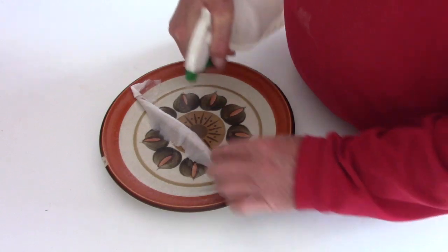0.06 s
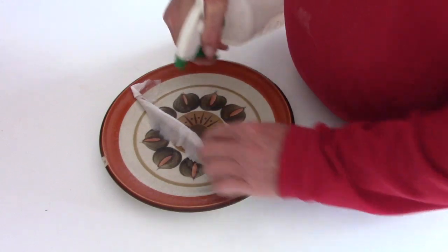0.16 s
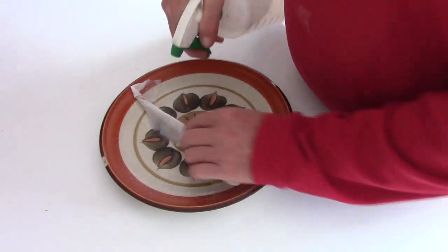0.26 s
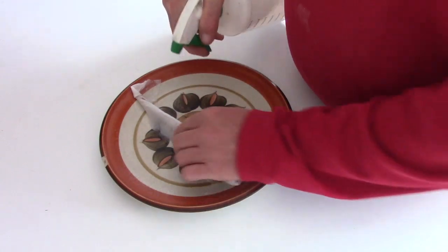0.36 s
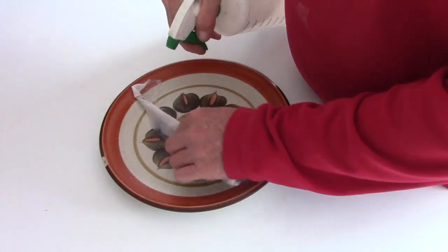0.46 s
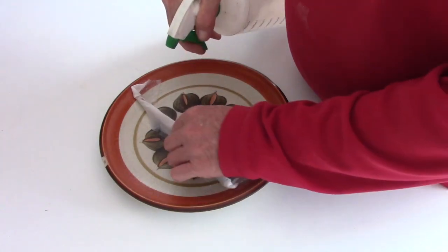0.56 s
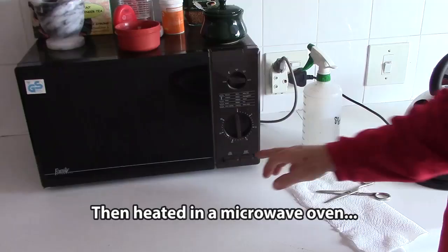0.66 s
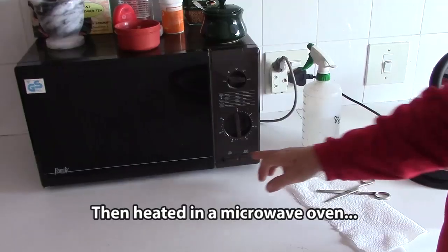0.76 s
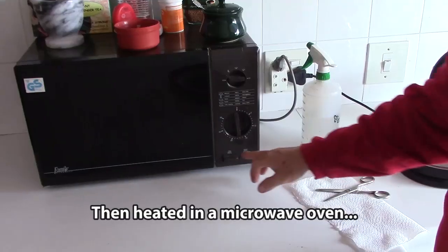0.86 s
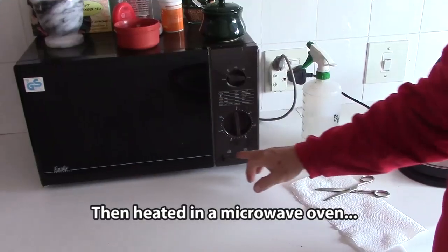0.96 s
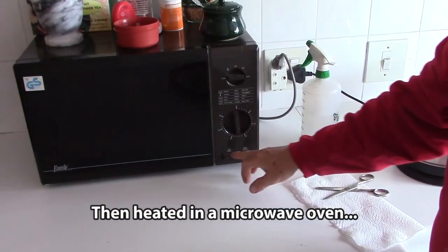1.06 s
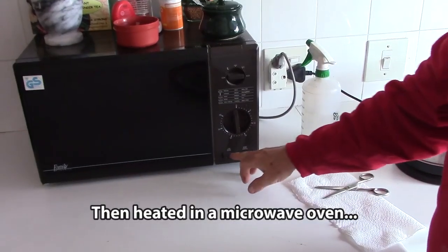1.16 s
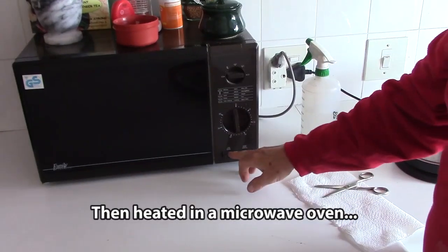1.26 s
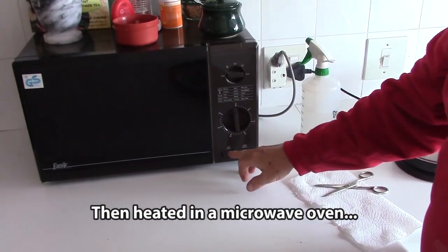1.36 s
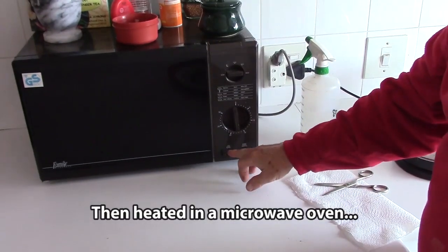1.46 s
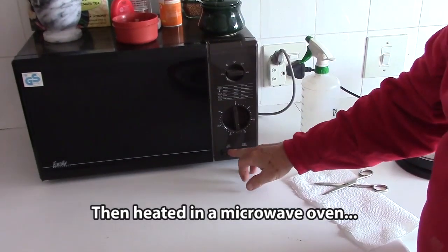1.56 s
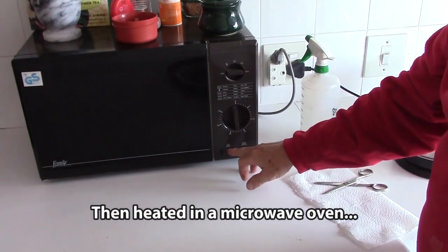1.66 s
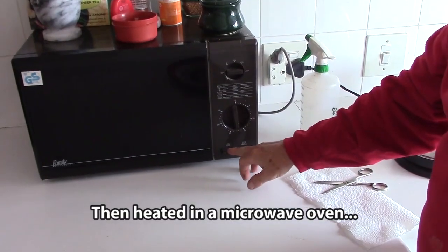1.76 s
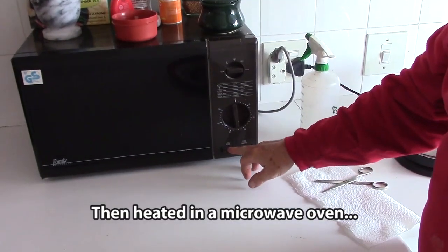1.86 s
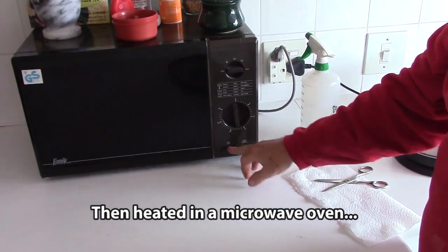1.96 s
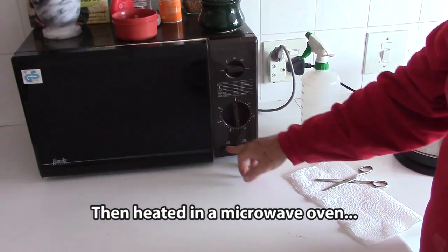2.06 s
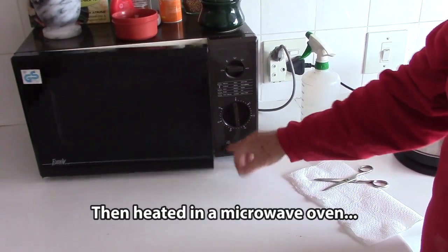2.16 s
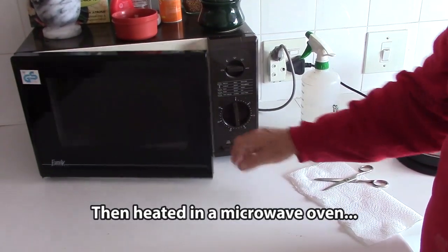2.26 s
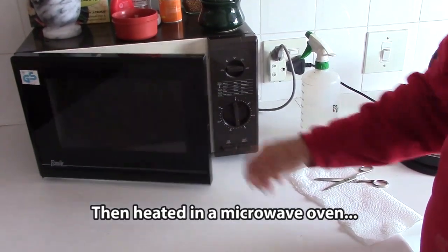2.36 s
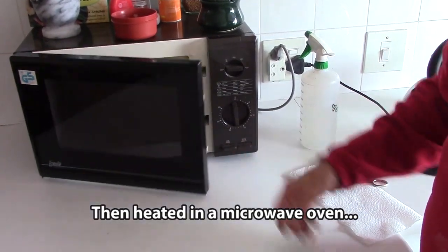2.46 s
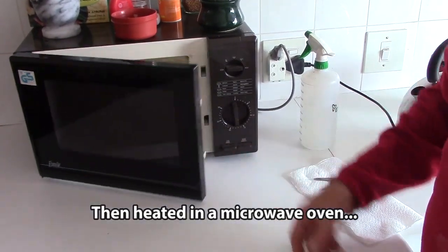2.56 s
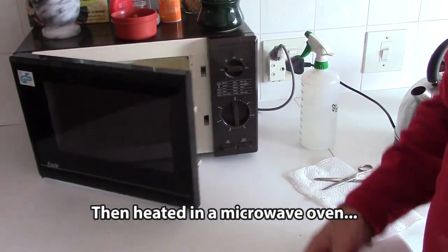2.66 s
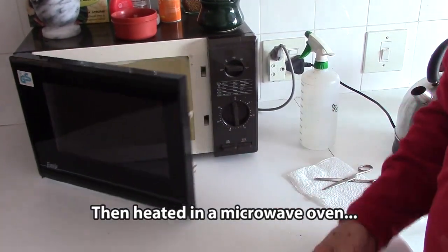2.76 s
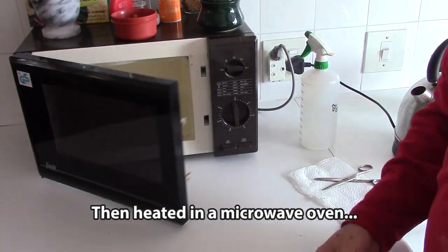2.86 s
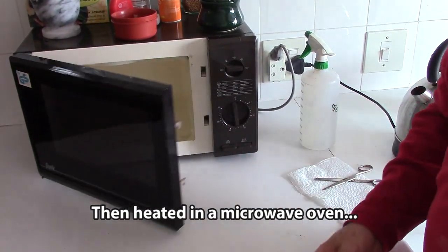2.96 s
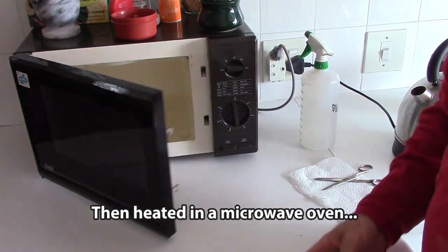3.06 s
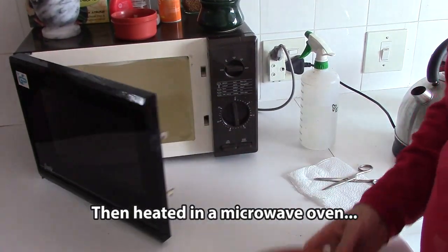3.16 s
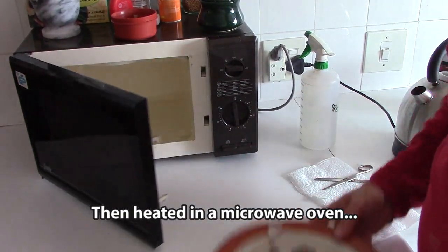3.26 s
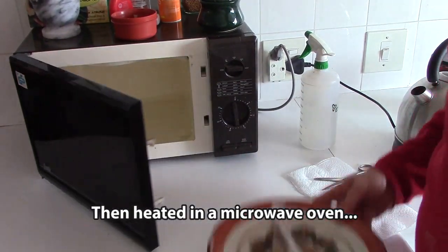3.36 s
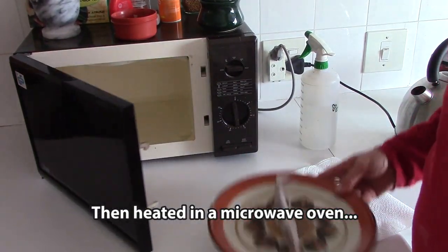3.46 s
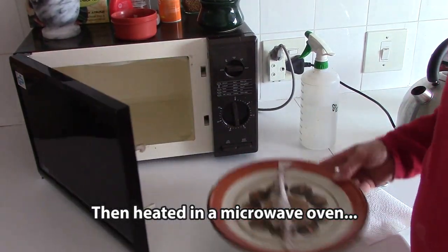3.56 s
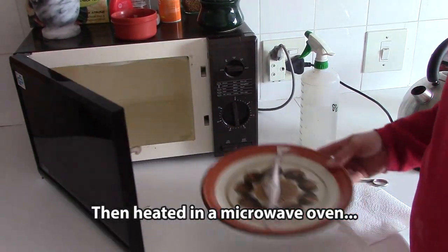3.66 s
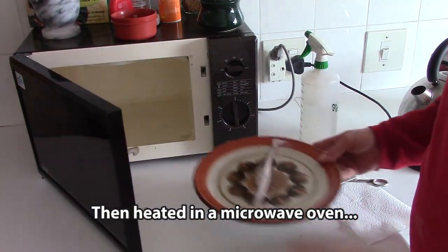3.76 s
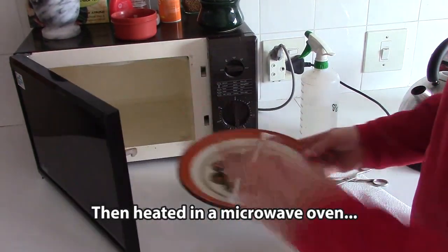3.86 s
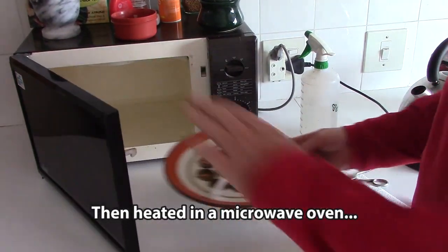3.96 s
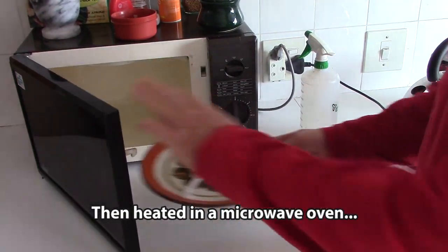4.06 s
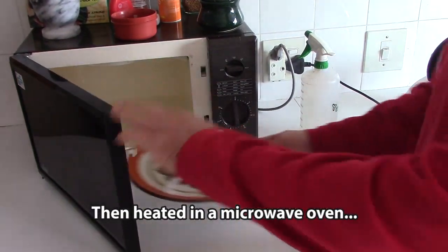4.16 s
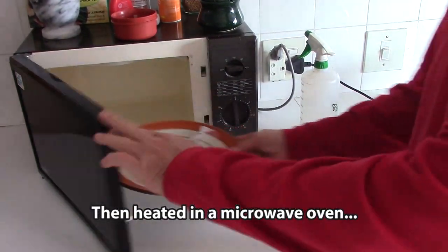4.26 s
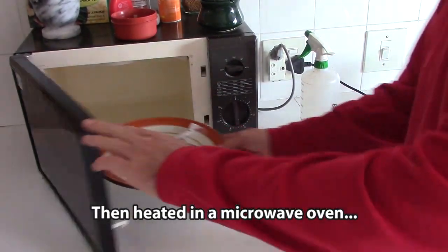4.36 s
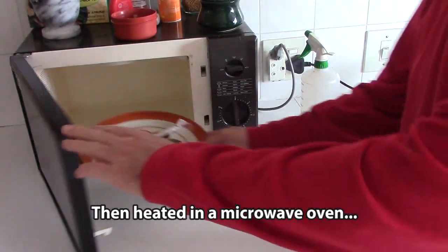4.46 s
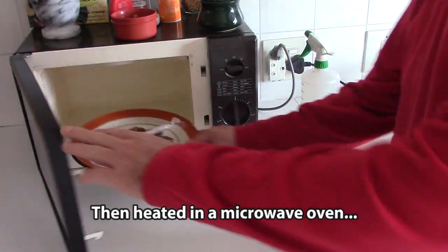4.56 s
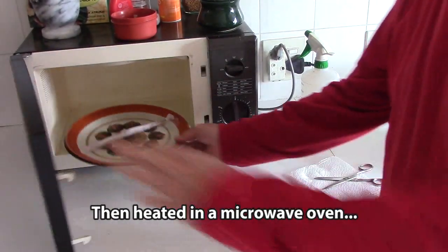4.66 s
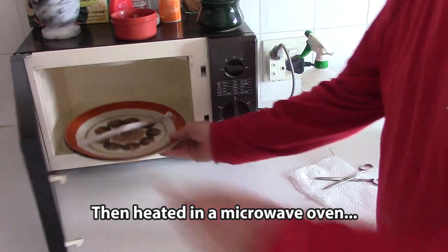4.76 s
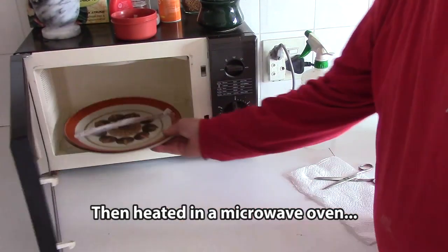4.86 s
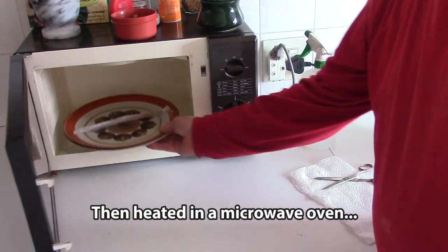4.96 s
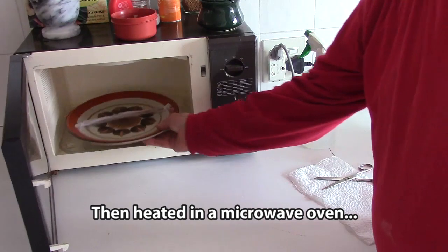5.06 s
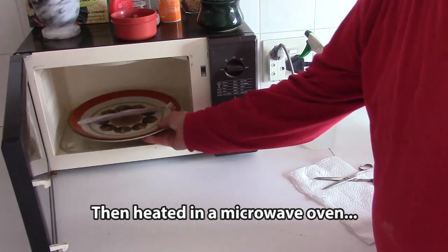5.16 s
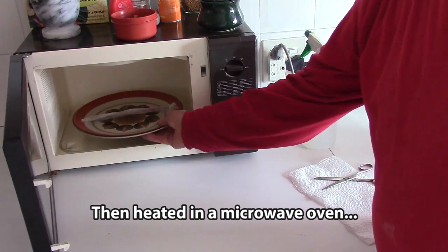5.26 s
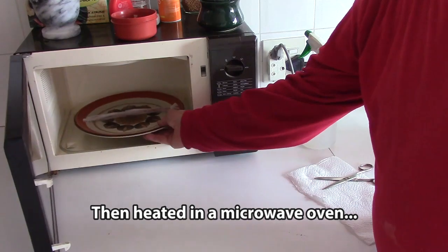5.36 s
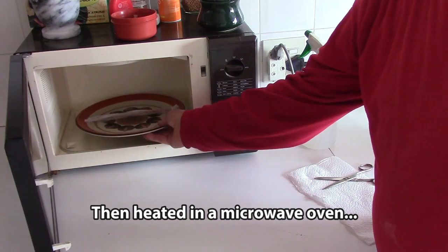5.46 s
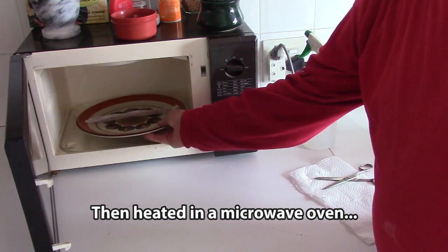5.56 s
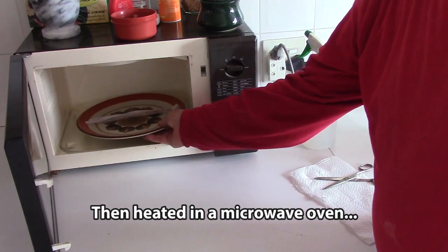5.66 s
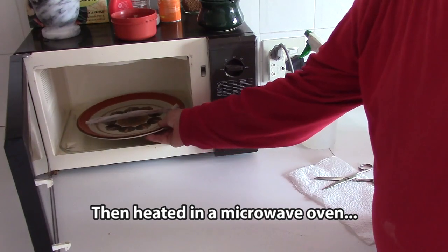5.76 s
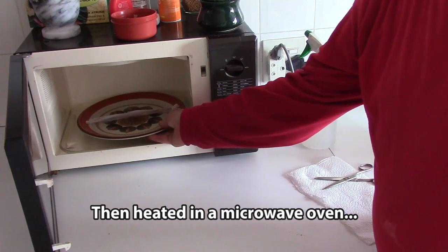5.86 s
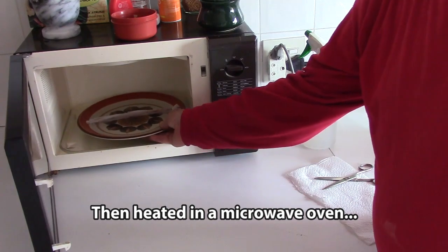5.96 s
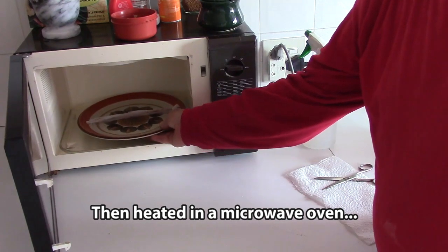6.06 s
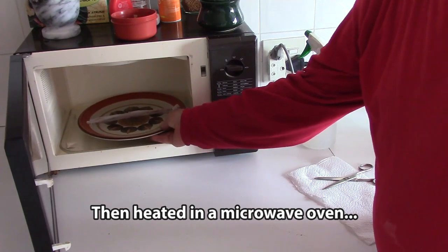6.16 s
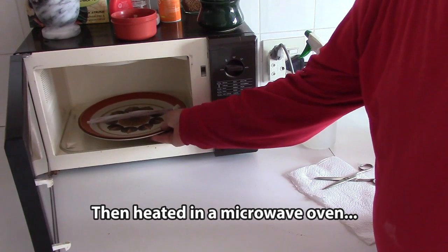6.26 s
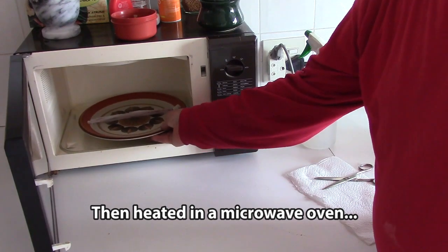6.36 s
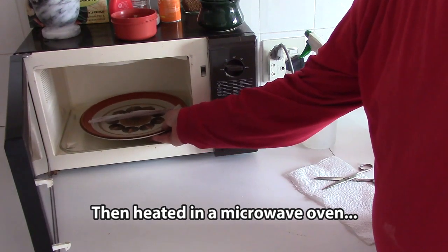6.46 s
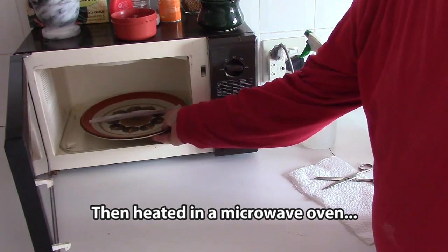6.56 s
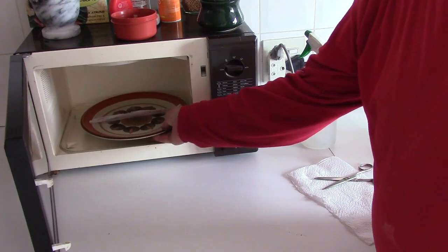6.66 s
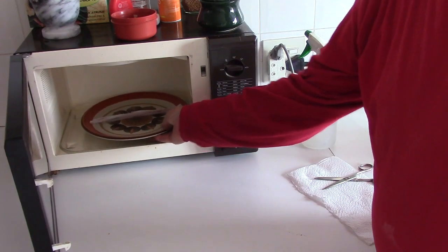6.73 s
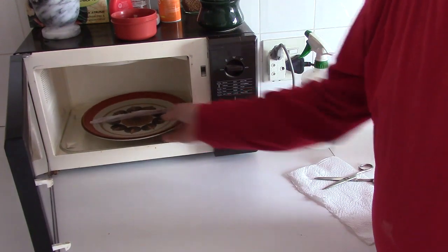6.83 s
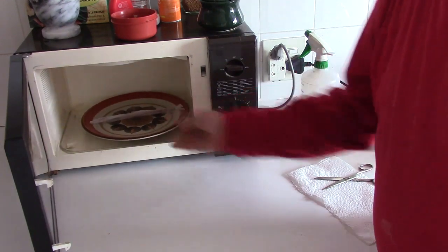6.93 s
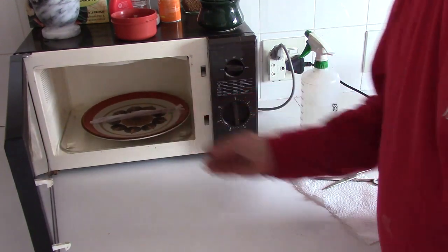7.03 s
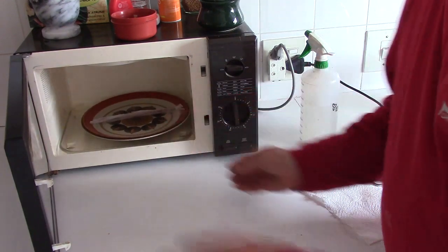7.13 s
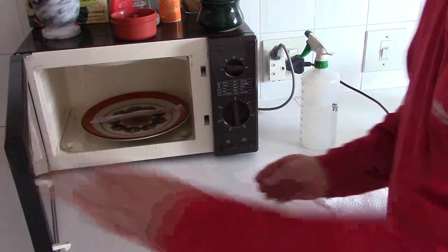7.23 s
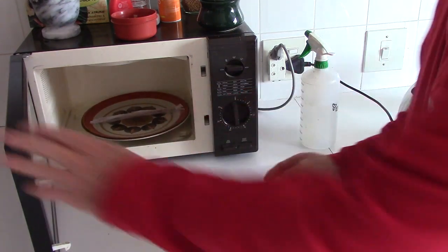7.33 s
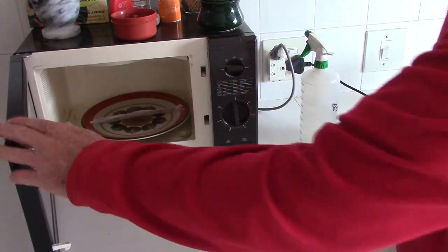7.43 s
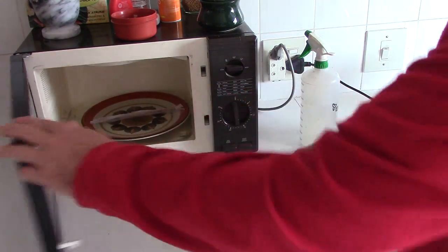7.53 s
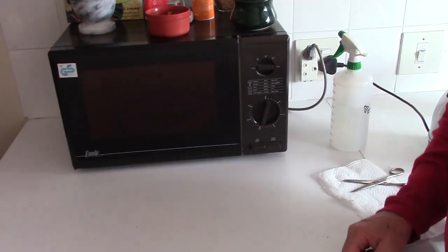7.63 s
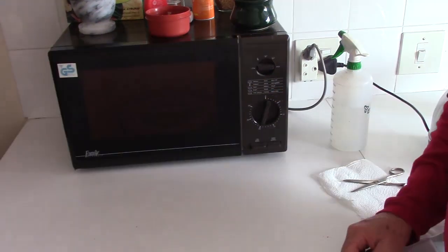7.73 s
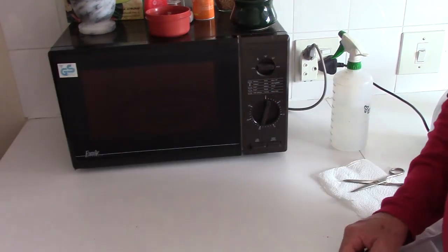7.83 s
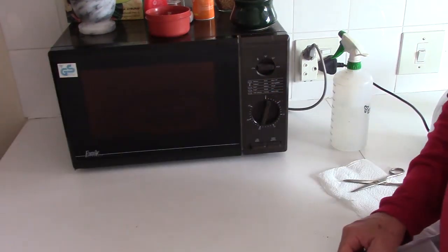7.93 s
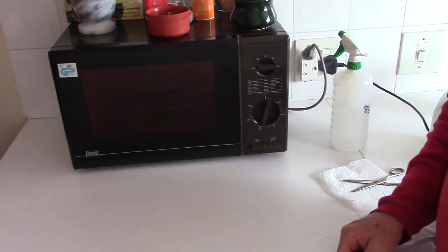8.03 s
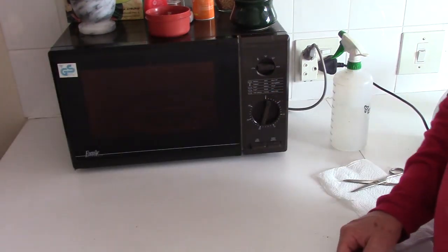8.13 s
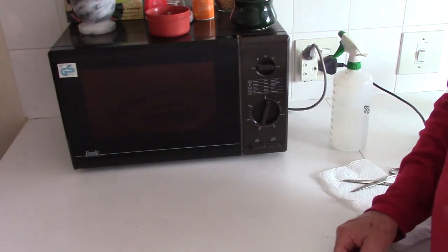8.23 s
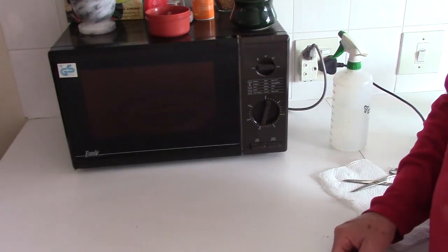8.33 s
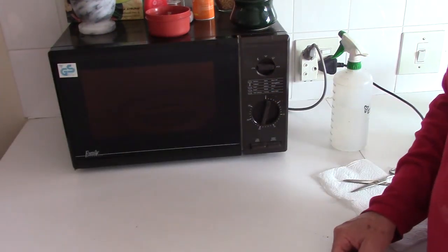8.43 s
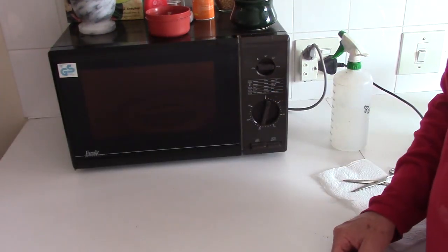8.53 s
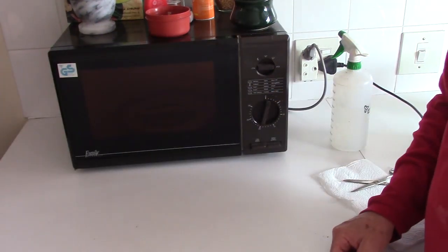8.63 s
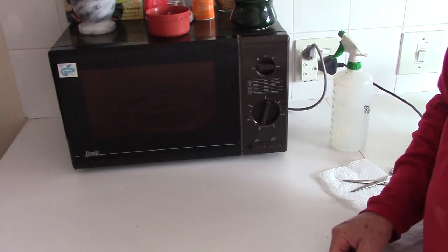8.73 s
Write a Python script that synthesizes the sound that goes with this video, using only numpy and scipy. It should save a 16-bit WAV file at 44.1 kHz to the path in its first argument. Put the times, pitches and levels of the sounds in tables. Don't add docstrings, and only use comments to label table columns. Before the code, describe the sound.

A spray bottle squirts and is set down, an oven door clunks open, a ceramic plate knocks loudly onto glass, then a microwave fan roars.

```python
import sys
import numpy as np
from scipy import signal
from scipy.fft import rfft, irfft
from scipy.io import wavfile
from scipy.ndimage import uniform_filter1d, minimum_filter1d

SR = 44100
rng = np.random.default_rng(int(sys.argv[2]) if len(sys.argv) > 2 else 0)


def how_loud(loudness_db):
    steps = np.asarray(loudness_db, float) / 20
    return 10 ** steps


def store_wav(level_fs):
    pcm = np.round(np.clip(np.atleast_2d(level_fs), -1, 1) * 32767)
    wavfile.write(sys.argv[1], SR, pcm.T.astype(np.int16))


N = 387638
FAN_ON_S = 7.649

# f/Hz, level/dB per Hz
AIR_COLOUR = [(15, -44), (25, -27), (53, -7.5), (104, -1), (222, -4.5), (307, -2.5), (382, -4), (557, -6.5),
              (672, -6.5), (1650, -15), (2100, -19.5), (6660, -28.5), (15800, -39)]
# t/s, level/dB
AIR_LEVEL = [
    (0, -51),
    (1.9, -52),
    (2.4, -52.5),
    (7.619, -47),
]
# f/Hz, likeness/0-1
AIR_SAME = [(60, 1), (180, 0.93), (550, 0.86), (1650, 0.81), (4970, 0.72), (15000, 1)]
# f/Hz, level/dB per Hz
FAN_COLOUR = [(15, -69), (25, -47), (113, -14.5), (184, -8), (261, -7.5), (299, -4), (361, -9.5), (542, -2),
              (857, -12.5), (1180, -9), (1820, -19.5), (3220, -25), (3900, -33.5), (10000, -48.5),
              (15800, -66)]
# f/Hz, likeness/0-1
FAN_SAME = [(60, 1), (15000, 0.99)]
# f/Hz, width/Hz, level/dB
CABINET = [(150.7, 3.3, -47.5), (191, 6.3, -39), (231.6, 7.5, -46.5), (294.4, 5.9, -51), (456, 51, -42),
           (540, 16, -47.5), (613, 7.7, -44), (1203, 43, -47), (1368, 19, -49), (1976, 42, -53.5),
           (3500, 390, -55.5), (5760, 500, -64.5)]
# f/Hz, level/dB
HUM = [(100, -59), (153, -47), (191, -40), (230, -45.5), (300, -43)]
# t/s, f/Hz, level/dB
MOTOR_WHINE = [
    (7.65, 5900, -61),
    (7.74, 6400, -62),
    (7.8, 6750, -62),
    (7.9, 6800, -76),
]

# t/s, peak/dB
FAINT_TICKS = [(2.3106, -48), (2.3894, -49), (2.488, -49), (2.615, -51), (2.6618, -52), (2.9542, -48),
               (2.9811, -53), (4.2686, -53), (6.222, -49), (6.32, -51), (6.374, -53), (6.428, -50),
               (6.694, -60), (6.858, -51), (7.511, -48), (7.58, -44.5)]
# t/s, peak/dB, centre f/Hz, time to fall 60 dB/s
CLICKS = [(.0105, -23, 7000, .012), (.1288, -20, 3900, .008), (.1355, -26, 1900, .025),
          (.2012, -27, 1900, .014), (.2823, -50, 10200, .042), (.5332, -36, 2600, .015),
          (2.602, -46, 2500, .02), (3.057, -43, 3500, .02), (3.5164, -43, 8300, .029),
          (4.2262, -40, 8000, .03), (4.2265, -41, 3500, .03), (4.229, -50, 3000, .2),
          (4.195, -56, 9000, .05)]
TIMER_TIMES = [3.0844, 3.254, 3.368, 3.6731, 4.38, 4.528, 4.6703, 4.807, 4.951, 5.1023, 5.249, 5.386,
               6.1576, 6.2677, 6.5844, 6.9144, 7.004, 7.1636, 7.3193, 7.446]

# f/Hz, level/dB per Hz
JET_COLOUR = [(180, -33), (300, -6), (342, -38), (424, -27), (581, -13), (968, -16), (1160, -12),
              (1330, -21), (1560, -5.5), (1870, -11.5), (3400, -5.5), (4350, -9), (5050, -9), (9760, -13.5),
              (15500, -24)]

# t/s, level/dB
SWING = [(2.7, -71), (2.776, -66), (2.81, -67), (2.842, -61), (2.872, -63), (2.93, -68)]
# t/s, level/dB
SWING_STOP = [(2.9, -71), (2.955, -55.5), (2.97, -56.5), (2.988, -49), (3.02, -56), (3.06, -64),
              (3.12, -68)]
# t/s, level/dB
SLEEVE = [
    (4.76, -77),
    (4.81, -65),
    (4.88, -74),
]
# t/s, level/dB
NUDGE = [
    (5.78, -53),
    (5.85, -42),
    (5.89, -37.5),
]
# t/s, level/dB
SLIDE = [(6.05, -80), (6.12, -61), (6.17, -56.5), (6.24, -72), (6.274, -53), (6.33, -49.5), (6.376, -55),
         (6.45, -48), (6.52, -41), (6.55, -49), (6.66, -70), (6.705, -59), (6.75, -62)]
# f/Hz, width/Hz, level/dB
HINGE = [(238, 50, 1.5), (380, 68, 3), (1030, 230, -1.5), (1334, 78, -7), (1505, 79, -7)]
# f/Hz, width/Hz, level/dB
SQUEAK = [(2560, 51, -4), (3500, 39, -4), (3730, 51, -3), (4460, 39, -6), (5260, 150, -10), (5610, 58, -8),
          (6170, 34, -8), (6300, 22, -10), (6910, 35, -4), (8400, 67, -6)]
# f/Hz, width/Hz, level/dB
SQUEAK_STOP = [(2020, 120, -9), (2370, 19, -7), (2590, 170, -2), (3350, 73, -6), (3590, 49, -1),
               (4670, 56, -6), (5200, 83, -1), (6200, 60, -4), (6820, 50, -8), (7500, 47, -17),
               (8060, 83, -16), (8690, 100, -17)]
# f/Hz, width/Hz, level/dB
BASE = [(337, 44, -7), (212, 8.1, -12), (260.5, 19, -2), (433, 18, -18), (590, 49, -7), (800, 110, -13),
        (1424, 25, -4), (2854, 120, 0)]
# f/Hz, width/Hz, level/dB
RIM = [(1100, 34, 0), (1490, 100, 0), (1690, 21, -9), (2080, 47, -9), (2960, 47, -1), (3920, 41, -6),
       (4150, 47, -16), (4400, 24, -14), (4660, 26, -19), (4960, 24, -22), (5390, 31, -10), (5790, 34, -18),
       (6310, 39, -18), (6500, 29, -25), (7220, 27, -27), (7840, 30, -27), (8100, 32, -27), (8650, 49, -27),
       (8970, 27, -25), (9880, 29, -28), (10400, 38, -29), (11000, 37, -29), (11900, 44, -32),
       (12700, 41, -35)]

# t/s, snap peak/dB, clatter peak/dB, ring peak/dB
TRIGGER = [
    (.012, -46, -43, -36),
    (.136, -52, -40, -53),
]
# t/s, snap peak/dB, clatter peak/dB, ring peak/dB
SET_DOWN = [
    (0.4564, -34, -44, -25),
    (0.5329, -61, -49, -32.5),
    (0.6181, -63, -64, -42),
]
# t/s, snap peak/dB, clatter peak/dB, ring peak/dB
BUTTON = [
    (1.2513, -55, -43.5, -53),
    (1.2699, -63, -64, -41),
    (1.3087, -48, -56.5, -42),
    (7.4545, -54, -54.5, -42.5),
    (7.4848, -51, -50.5, -42),
    (7.6241, -34.5, -48.5, -39),
]
# t/s, snap peak/dB, clatter peak/dB, ring peak/dB
LATCH = [
    (1.954, -44.5, -50, -44),
    (1.968, -55, -56, -38),
    (1.984, -46, -47, -35),
    (1.992, -23, -31.5, -27.5),
    (2.030, -26, -28.5, -17.5),
    (2.0434, -31, -28.5, -18),
    (2.0575, -40, -33, -20.5),
]
# t/s, snap peak/dB, clatter peak/dB, ring peak/dB
SHUDDER = [
    (2.098, -33, -23.5, -11.5),
    (2.1073, -35, -36, -13),
    (2.122, -41, -40, -15),
    (2.1335, -32, -34, -21),
    (2.159, -34, -43, -23),
    (2.2006, -66, -38, -22),
    (2.631, -54, -53, -43.5),
    (2.986, -54, -49.5, -32),
]
# t/s, snap peak/dB, clatter peak/dB, ring peak/dB
LATCH_FREE = [
    (2.179, -13, -20, -10),
    (2.2, -44, -34, -22),
    (2.232, -36, -43, -21.5),
    (2.259, -44, -41, -27),
]
# t/s, snap peak/dB, clatter peak/dB, ring peak/dB
PLATE_DOWN = [
    (5.531, 0, -14.5, 0.86),
]
# t/s, snap peak/dB, clatter peak/dB, ring peak/dB
TRAY_BUMP = [
    (5.8856, -17.5, -28, -10),
    (5.9089, -36, -39, -19.5),
]
# t/s, snap peak/dB, clatter peak/dB, ring peak/dB
TRAY_SETTLE = [
    (6.525, -58, -50, -30.5),
]
# t/s, snap peak/dB, clatter peak/dB, ring peak/dB
LET_GO = [
    (6.7395, -22.5, -25.5, -16),
    (6.7495, -17.5, -30.5, -11.5),
]

# f/Hz, level/dB, time to fall 60 dB/s
COUNTER = [(100.4, -0.5, 0.44), (131, -5, 0.42), (185, 1.5, 0.59), (258, -3.5, 0.54), (358, -5, 0.25),
           (376, 5, 0.17), (464, -9, 0.32), (537, -1, 0.12)]
# f/Hz, level/dB, time to fall 60 dB/s
DOOR = [(177, 4, 0.35), (192, -9, 1.5), (264, -9.5, 1.56), (341.5, 9.5, 0.1), (397, 2.5, 0.31),
        (412, -6.5, 0.89), (450, 10.5, 0.085), (556, -6, 0.27), (643, -13, 0.26)]
# f/Hz, level/dB, time to fall 60 dB/s
TRAY = [(190.0, 0.0, 0.33), (213.0, -8.8, 0.99), (245.0, -13.0, 1.3), (268.0, -6.7, 0.93),
        (305.0, -7.7, 0.33), (375.0, -14.4, 1.14), (407.0, -8.2, 1.3), (436.0, -12.5, 0.72),
        (507.0, -7.4, 0.59), (526.0, -1.3, 0.43), (558.0, -12.9, 0.55), (580.0, -7.7, 0.44),
        (615.0, -10.5, 1.3), (654.0, -8.5, 0.48), (766.0, -8.5, 0.53), (799.0, -14.6, 0.53),
        (851.0, -4.3, 0.32), (883.0, -13.3, 0.79), (976.0, -9.7, 0.39), (1069.0, -11.7, 0.35),
        (1097.0, -13.4, 0.72), (1223.0, -9.1, 0.37), (1277.0, -11.7, 0.47), (1365.0, -23.2, 0.7),
        (1433.0, -20.7, 0.48), (1459.0, -3.3, 0.24), (1476.0, -2.1, 0.27), (1494.0, -4.6, 0.28),
        (1552.0, -21.0, 0.65), (1699.0, -14.6, 0.39), (1727.0, -20.4, 0.52), (1920.0, -16.5, 0.5),
        (2023.0, -8.6, 0.26), (2194.0, -18.8, 0.34), (2235.0, -12.5, 0.26), (2261.0, -16.1, 0.3),
        (2293.0, -20.3, 0.5), (2504.0, -13.6, 0.26), (2654.0, -13.8, 0.25), (2872.0, -12, 0.28),
        (3071.0, -8, 0.26), (3212.0, -11, 0.23), (3451.0, -23.1, 0.37), (4961.0, -27.1, 0.34)]
# f/Hz, level/dB, time to fall 60 dB/s
PLATE_ON_TRAY = [(208.0, -9, 0.7), (274.0, -7.8, 1.3), (303.0, -0.6, 0.35), (370.0, -5.1, 0.7),
                 (398.0, -3.9, 0.41), (441.0, -11.2, 1.06), (570.0, -0.3, 0.39), (639.0, -9.5, 0.93),
                 (657.0, -4.6, 0.45), (766.0, 0.0, 0.33), (851.0, -5.1, 0.47), (956.0, -3.8, 0.35),
                 (1006.0, -7.9, 0.45), (1085.0, -9.7, 0.47), (1266.0, -3, 0.4), (1320.0, -6, 0.45),
                 (1421.0, -1.4, 0.32), (1445.0, -1.2, 0.35), (1509.0, -0.4, 0.29), (1678.0, -11.0, 0.55),
                 (1717.0, -13.1, 0.51), (1773.0, -0.4, 0.29), (1869.0, -8.1, 0.36), (2052.0, -5.6, 0.36),
                 (2082.0, -5, 0.3), (2362.0, -9.4, 0.35), (2392.0, -11, 0.34), (2413.0, -12.9, 0.44),
                 (2682.0, -9.3, 0.38), (2778.0, -7.2, 0.27), (2828.0, -5.2, 0.25), (2924.0, -10.0, 0.35),
                 (3329.0, -20, 0.3), (3625.0, -8, 0.3), (3905.0, -12, 0.31), (4110.0, -8, 0.28),
                 (4452.0, -12, 0.2), (5043.0, -16.7, 0.29), (5067.0, -19.2, 0.33), (5855.0, -19.8, 0.27)]
# f/Hz, width/Hz, level/dB
HOOK = [(985, 120, 0), (1310, 90, -3), (1460, 18, -8), (1870, 78, -2), (2360, 35, -14), (2600, 64, 5),
        (2830, 120, -8), (3350, 34, -12), (3780, 43, -12), (4130, 89, -11), (4950, 200, -11),
        (5650, 66, -17)]
# f/Hz, width/Hz, level/dB
HOOK_FREE = [(900, 48, -8), (1170, 86, 1), (1620, 50, 6.5), (2045, 45, -4), (2470, 30, -5), (2650, 36, -12),
             (2940, 95, -10), (3200, 36, -8), (3900, 39, -14), (4250, 55, -17), (4810, 220, -16),
             (5300, 41, -9)]
# f/Hz, level/dB
PLATE = [(109, -30.0), (207, -16.0), (260, -25.0), (275, -15.0), (309, -25.0), (372, -21.0), (439, -20.0),
         (462, -13.0), (482, -6.0), (515, -8.0), (556, -9.0), (608, -7.0), (622, -8.0), (647, -6.0),
         (686, -11.0), (761, -10.0), (842, -8.0), (867, -2.0), (890, -12.0), (904, -11.0), (1084, -13.0),
         (1273, -9.0), (1314, -9.0), (1330, 2.0), (1343, -4.0), (1360, -4.0), (1492, -9.0), (1513, -9.0),
         (1534, -12.0), (1559, -12.0), (1772, -12.0), (1977, -10.0), (1996, -7.0), (2015, -9.0),
         (2367, -8.0), (2493, -9.0), (2606, -9.0), (2822, -9.0), (2902, -12.0), (2927, -10.0), (2951, -7.0),
         (2968, -7.0), (3615, -8.0), (3633, -8.0), (3647, -7.0), (3685, -11.0), (3706, -10.0),
         (4008, -12.0), (4039, -12.0), (4388, -17.0), (4614, -16.0), (4917, -19.0), (4929, -9.0),
         (5163, -16.0), (5276, -14.0), (6204, -10.0), (6221, -7.0), (6568, -23.0), (7201, -4.0),
         (7215, -17.0)]
# f/Hz, level/dB
GLAZE = [(7713, -7.0), (8067, -3.0), (8623, -5.0), (9083, -1.0), (9835, -2.0), (10126, -8.0), (10426, -8.0),
         (10926, -5.0), (11209, -7.0), (11493, -7.0), (11812, 0.0), (14025, -16.0)]
# f/Hz, level/dB
GLAZE_ON_TRAY = [(6131, -5.0), (6345, -2.0), (6572, -9.0), (6979, -9.0), (7244, -10.0), (7873, 0.0),
                 (8441, -8.0), (9452, -6.0), (10993, -15.0), (11162, -14.0)]
# f/Hz, time to fall 60 dB/s
PLATE_T60 = [(250, .8), (600, .4), (1300, .42), (3000, .33), (7000, .25), (12000, .18)]
# f/Hz, level/dB per Hz
PLASTIC = [(59, -55), (100, -22), (238, -4), (530, 0.5), (774, -2), (898, 0.5), (977, -3), (2090, -5),
           (5630, -21), (15500, -43)]
# f/Hz, level/dB per Hz
CERAMIC = [(59, -79), (100, -47), (400, -28), (861, -7), (1180, -18), (1400, -12), (2250, -23), (2650, -9),
           (2950, -12), (3150, -30), (3690, -18.5), (4600, -39), (5200, -24), (5630, -35), (6300, -43),
           (6850, -34), (7410, -45), (8400, -33), (9300, -43), (12300, -55), (14000, -52), (15500, -73)]
# f/Hz, level/dB per Hz
GLASS = [(59, -58), (100, -7), (243, -2), (467, -6.5), (541, 2.5), (1180, -1), (1460, -2), (1590, -5.5),
         (2870, -8), (15500, -43)]
# f/Hz, time to fall 60 dB/s
FADE = [(120, 1), (330, 0.65), (870, 0.51), (2300, 0.48), (6060, 0.44)]


def evened(x):
    return x / np.sqrt(np.mean(x ** 2) + 1e-20)


def read(points, hz):
    f, value = np.transpose(points)
    return np.interp(np.log(hz + 1), np.log(f + 1), value)


def add(mix, s, sound):
    part = mix[round(s * SR):][:len(sound)]
    part += sound[:len(part)]


def wander(count, points, per_s, t):
    values = rng.standard_normal((count, points))
    return np.array([np.interp(per_s * t, np.arange(points), row) for row in values])


def span(rows):
    s, *columns = np.transpose(rows)
    t = np.arange(s[0], s[-1], 1 / SR)
    return s[0], [np.interp(t, s, c) for c in columns]


def resonate(x, hz, width):
    return signal.lfilter(*signal.iirpeak(hz, hz / width, SR), x)


def steep(x, hz, width):
    once = resonate(x, hz, 1.6 * width)
    return evened(resonate(once, hz, 1.6 * width))


def wash(colour, same, patchy_db):
    frames, hz = N // 512 + 5, np.fft.rfftfreq(2048, 1 / SR)
    a, b, c, d, patches = rng.standard_normal((frames, 1025, 5)).T
    patches = uniform_filter1d(patches, size=20, axis=0)
    patches = evened(uniform_filter1d(patches, size=6, axis=1))
    same = np.clip(read(same, hz), -1, 1)[:, None]
    left = a + 1j * b
    right = same * left + np.sqrt(1 - same ** 2) * (c + 1j * d)
    z = np.array([left, right]) * how_loud(read(colour, hz)[:, None] + patchy_db * patches)
    return evened(signal.istft(z, nperseg=2048, noverlap=1536)[1][:, :N])


def room_tone():
    level_db = np.interp(np.arange(N) / SR, *np.transpose(AIR_LEVEL))
    return how_loud(level_db) * wash(AIR_COLOUR, AIR_SAME, patchy_db=.4)


def electronic_whistle():
    return how_loud(-87) * steep(rng.standard_normal(N), hz=11000, width=120)


def walls(x, t60):
    taps = np.zeros((2, SR // 2))
    slots = np.arange(200, SR // 2 - 20, 20)
    at = slots + rng.integers(0, 20, (2, len(slots)))
    np.put_along_axis(taps, at, rng.choice([-1., 1.], at.shape), 1)
    taps *= how_loud(-60 * np.arange(SR // 2) / SR / t60)
    taps = signal.lfilter([1, -.93], [1, -1.3, .45], taps)
    return signal.fftconvolve(x[None], taps / np.linalg.norm(taps[0]), axes=1)[:, :N]


def fan():
    t = np.arange(N) / SR
    gust = rng.standard_normal(N)
    cabinet = sum(how_loud(db) * steep(gust, f, w) for f, w, db in CABINET)
    hum = sum(how_loud(db) * np.sqrt(2) * np.sin(2 * np.pi * f * t) for f, db in HUM)
    turn = (t - 8.1) * 38.3 % 1
    touch = .15 + np.exp(-turn / .1)
    graze = how_loud(-72) * steep(gust * touch, hz=11400, width=800)
    blast = wash(FAN_COLOUR, FAN_SAME, patchy_db=1.1)
    roar = how_loud(-27.5) * (how_loud(-3.0) * blast + how_loud(28.5) * cabinet)
    return (roar + hum + graze) * np.clip((t - FAN_ON_S) / 0.0011, 0, 1)


def whine():
    s, (hz, db) = span(MOTOR_WHINE)
    waver = evened(uniform_filter1d(rng.standard_normal(len(hz)), size=110))
    return s, how_loud(db) * waver * np.sin(2 * np.pi * np.cumsum(hz) / SR)


def puffs(rows):
    out, t = np.zeros(N), np.arange(6000) / SR
    for s, db, hz, t60 in rows:
        puff = steep(rng.standard_normal(len(t)), hz, 0.57 * hz) * how_loud(-60 * t / t60)
        add(out, s, how_loud(db) * puff / abs(puff).max())
    return out


def clicks_and_timer():
    timer_db = -52.5 + 1.2 * rng.standard_normal(len(TIMER_TIMES))
    ticks = FAINT_TICKS + list(zip(TIMER_TIMES, timer_db))
    return puffs(CLICKS + [(s, db, 7200, .05) for s, db in ticks])


def squirt():
    times = np.cumsum([.015, .018, .045, .045, .012, .06])  # start, then the length of each stage, s
    s, (jet_db,) = span(np.transpose([times, -31.5 + np.array([-19, 0, 0, -9.5, -17, -33])]))
    n = len(jet_db)
    spectrum = rfft(rng.standard_normal(n)) * how_loud(read(JET_COLOUR, np.fft.rfftfreq(n, 1 / SR)))
    hiss = irfft(spectrum, n)
    sputter_db = 0.52 * evened(uniform_filter1d(rng.standard_normal(n), size=120))
    nozzle = how_loud(-13) * steep(hiss, hz=1580, width=35)
    return s, how_loud(jet_db + sputter_db) * (evened(hiss) + nozzle)


def rub(rows, peaks, slips_per_s, grit_db, body_db, follow):
    s, (rub_db,) = span(rows)
    n = len(rub_db)
    chance, size, hiss = rng.random(n), rng.exponential(1, n), rng.standard_normal(n)
    slips = (chance < slips_per_s / SR) * how_loud(1.6 * size) * np.sign(hiss)
    slips = evened(slips) + 0.94 * hiss
    drift_db = 1.5 * wander(len(peaks), 40, 35, np.arange(n) / SR)
    low, high = np.zeros(n), np.zeros(n)
    for (f, w, db), drift in zip(peaks, drift_db):
        band = low if f < 2000 else high
        band += how_loud(db + drift) * steep(slips, f, w)
    grit = how_loud(grit_db) * steep(hiss, hz=2030, width=1600)
    body = how_loud(body_db + follow * (rub_db + 50)) * evened(low)
    sound = how_loud(rub_db) * (evened(high) + grit) + body
    return s, sound * signal.windows.tukey(n, .08)


def hinge_rubs(near):
    add(near, *rub(SWING, HINGE + SQUEAK, slips_per_s=440, grit_db=1.0, body_db=-42.5, follow=0.71))
    add(near, *rub(SWING_STOP, HINGE + SQUEAK_STOP, slips_per_s=280, grit_db=0.5, body_db=-41.5, follow=0.98))


def plate_rubs(near):
    add(near, *rub(SLEEVE, BASE + RIM, slips_per_s=300, grit_db=-1.0, body_db=-60, follow=0.7))
    add(near, *rub(NUDGE, BASE + RIM, slips_per_s=870, grit_db=-1.5, body_db=-41.5, follow=0.57))
    add(near, *rub(SLIDE, BASE + RIM, slips_per_s=200, grit_db=-5, body_db=-45.0, follow=0.68))


def rung(peaks, db):
    return [(f, level_db + db, 3.0 / w) for f, w, level_db in peaks]


def damped(lines, db):
    return [(f, level_db + db, read(PLATE_T60, f)) for f, level_db in lines]


def crack(noise, t, colour, bright_db, damping, rise_s, hold_s, loose):
    f, frame_s, z = signal.stft(noise, SR, nperseg=512, noverlap=384)
    shape_db = read(colour, f) + bright_db * np.log2(f / 1000 + 0.056)
    fall_db = 60 * np.maximum(frame_s, hold_s) / (damping * read(FADE, f))[:, None]
    z = z * how_loud(shape_db[:, None] - fall_db)
    clatter = signal.istft(z, SR, nperseg=512, noverlap=384)[1][:len(t)] * np.minimum(t / rise_s, 1)
    return clatter * how_loud(loose * 3.5 * wander(1, 200, 220, t)[0])


def modes_ring(t, modes, spread_hz, fuzz, damping, rise_s, hold_s):
    hz, db, t60 = np.transpose(modes)[:, :, None]
    fuzz = fuzz * np.minimum(1, (3500 / hz) ** 2)
    below, above, turn, other = rng.random((len(hz), 4)).T[:, :, None]
    lines = np.sin(2 * np.pi * hz * t)
    lines += fuzz * np.sin(2 * np.pi * ((hz - spread_hz * below) * t + turn))
    lines += fuzz * np.sin(2 * np.pi * ((hz + spread_hz * above) * t + other))
    sign = np.sign(np.cos(hz / 90))
    flutter_db = 2.2 * wander(len(hz), 64, 80, t)
    fall_db = 60 * np.maximum(t, hold_s) / (damping * t60)
    return (sign * how_loud(db + flutter_db - fall_db) * lines).sum(0) * np.minimum(t / rise_s, 1)


def knocks(rows, colour, modes, snap_hz, spread_hz, fuzz, rise_s, bright_db, damping, hold_s=0, loose=1):
    out = np.zeros(N)
    for s, snap_db, clatter_db, ring_db in rows:
        noise = rng.standard_normal(SR)[:round((.15 + .5 * damping) * SR)]
        t = np.arange(len(noise)) / SR
        snap = steep(noise, snap_hz, 0.98 * snap_hz) * how_loud(-60 * t / 0.079)
        clatter = crack(noise, t, colour, bright_db, damping, rise_s, hold_s, loose)
        ring = modes_ring(t, modes, spread_hz, fuzz, damping, rise_s, hold_s)
        for peak_db, part in ((snap_db, snap), (clatter_db + 10.0, clatter), (ring_db, ring)):
            add(out, s, how_loud(peak_db) * part / abs(part).max())
    return out


def tray_settling():
    return knocks(TRAY_SETTLE, GLASS, TRAY[:20], snap_hz=3700, spread_hz=30, fuzz=0.17,
                  rise_s=0.004, bright_db=0.0, damping=0.99)


def bottle_knocks():
    trigger = knocks(TRIGGER, PLASTIC, COUNTER, snap_hz=7000, spread_hz=16.4, fuzz=0.55,
                     rise_s=0.00085, bright_db=2.0, damping=1.0)
    return trigger + knocks(SET_DOWN, PLASTIC, COUNTER, snap_hz=2890, spread_hz=24.3, fuzz=1.0,
                            rise_s=0.00099, bright_db=-2.5, damping=0.82)


def door_knocks():
    button = knocks(BUTTON, PLASTIC, DOOR, snap_hz=5500, spread_hz=30, fuzz=0.57,
                    rise_s=0.0026, bright_db=-2.5, damping=0.61)
    latch = knocks(LATCH, PLASTIC, DOOR + rung(HOOK, db=3), snap_hz=5700, spread_hz=28.6, fuzz=0.95,
                   rise_s=0.0066, bright_db=0.5, damping=0.86)
    shudder = knocks(SHUDDER, PLASTIC, DOOR, snap_hz=6000, spread_hz=24.4, fuzz=0.97,
                     rise_s=0.0055, bright_db=-4.0, damping=0.84)
    freed = knocks(LATCH_FREE, PLASTIC, rung(HOOK_FREE, db=0), snap_hz=5300, spread_hz=29, fuzz=.6,
                   rise_s=0.00084, bright_db=0.4, damping=0.89)
    return button + latch + shudder + freed


def plate_knocks():
    plate = knocks(PLATE_DOWN, CERAMIC, damped(PLATE, db=0) + damped(GLAZE, db=-16), snap_hz=2000,
                   spread_hz=45, fuzz=.5, rise_s=.001, bright_db=0, damping=1.04, hold_s=.068, loose=.3)
    bump = knocks(TRAY_BUMP, GLASS, TRAY, snap_hz=3100, spread_hz=30.6, fuzz=0.49,
                  rise_s=0.0021, bright_db=0.1, damping=0.97, hold_s=0.022)
    together = PLATE_ON_TRAY + damped(GLAZE_ON_TRAY, db=-21) + [(1388, 15, .07)]
    let_go = knocks(LET_GO, GLASS, together, snap_hz=1840, spread_hz=39.4, fuzz=0.67,
                    rise_s=0.0021, bright_db=1.4, damping=0.85)
    return plate + bump + let_go


def scene():
    near = clicks_and_timer() + electronic_whistle()
    near += tray_settling()
    near += bottle_knocks()
    near += door_knocks()
    near += plate_knocks()
    add(near, *squirt())
    add(near, *whine())
    hinge_rubs(near)
    plate_rubs(near)
    air = how_loud(-2.5) * room_tone()
    direct = near * how_loud(np.array([[.15], [-.15]]))
    return direct + how_loud(-22.5) * walls(near, t60=0.28) + air + fan()


def top_cut(x):
    return signal.sosfilt(signal.butter(12, 16490, fs=SR, output="sos"), x)


def record(dry):
    dry = signal.lfilter(*signal.butter(1, 70, "high", fs=SR), dry)
    ahead = -minimum_filter1d(-abs(dry).max(0), size=150)
    peak_db = 20 * np.log10(ahead + 1e-9)
    fall = np.arange(N) * 1100.0 / SR
    held_db = np.maximum.accumulate(peak_db + fall) - fall
    over_db = np.maximum(held_db + .3, 0)
    limited = dry / how_loud(uniform_filter1d(over_db, size=150))
    edge = signal.firwin(401, 15800, window=("kaiser", 9), fs=SR)[None]
    mix = signal.oaconvolve(limited, edge, "same")
    return top_cut(mix)


dry = scene()
out = record(dry)
store_wav(out)
```